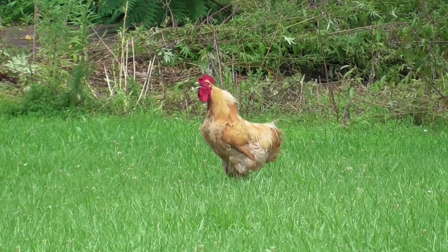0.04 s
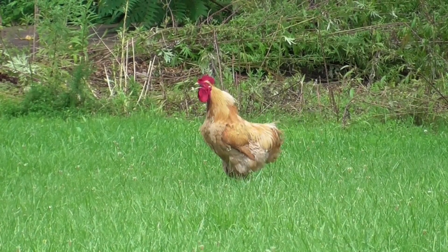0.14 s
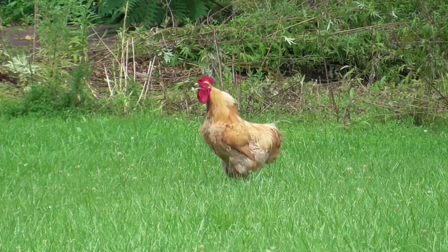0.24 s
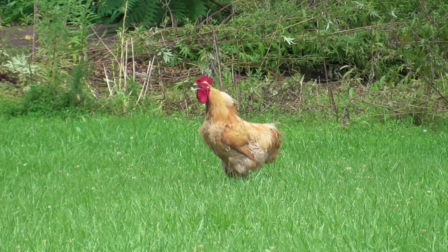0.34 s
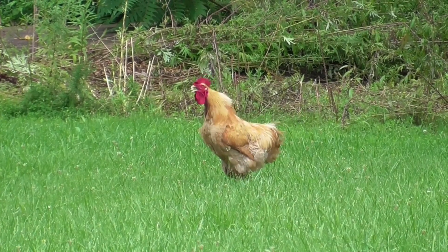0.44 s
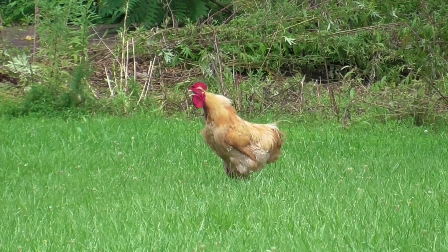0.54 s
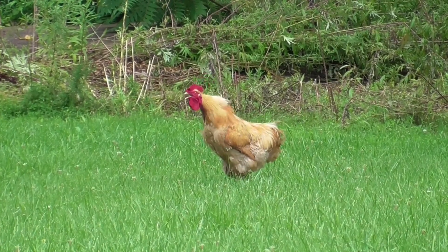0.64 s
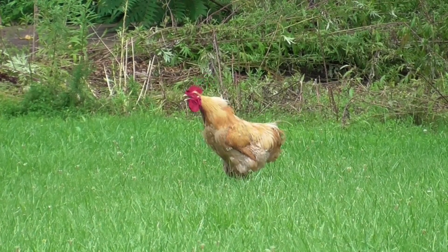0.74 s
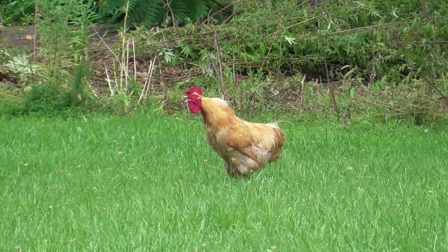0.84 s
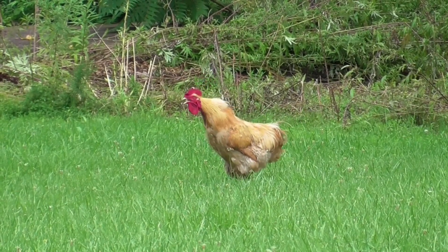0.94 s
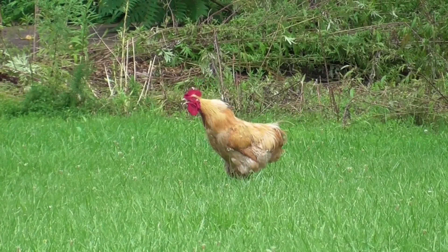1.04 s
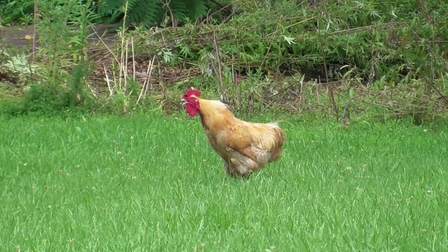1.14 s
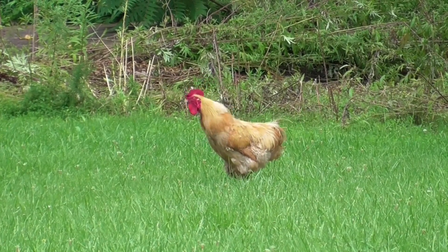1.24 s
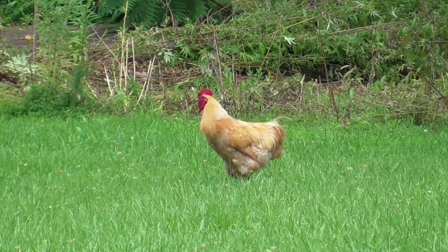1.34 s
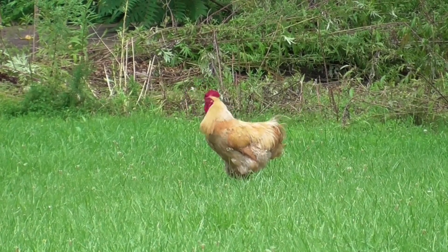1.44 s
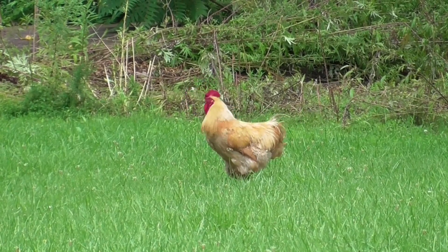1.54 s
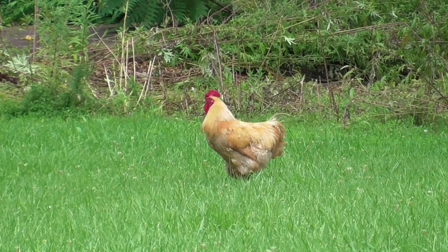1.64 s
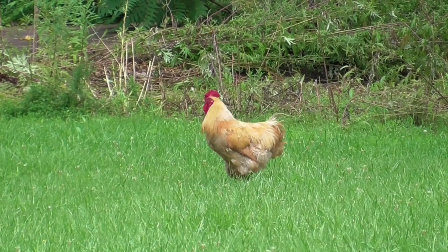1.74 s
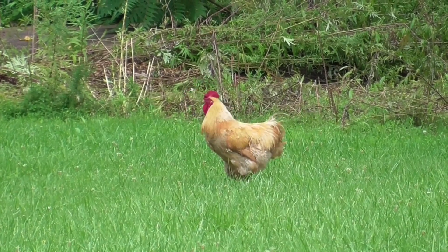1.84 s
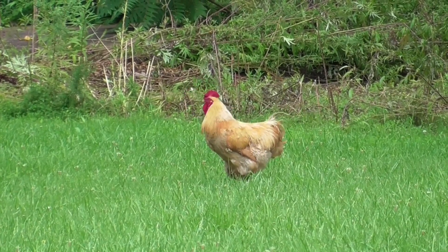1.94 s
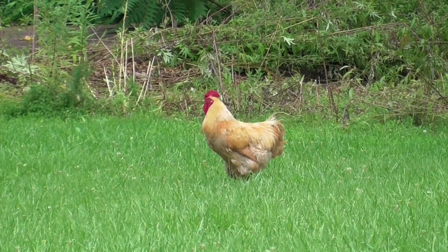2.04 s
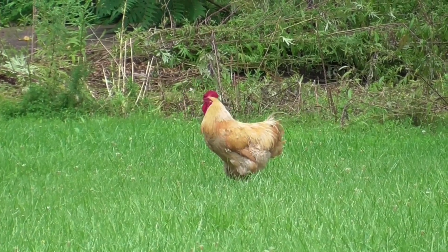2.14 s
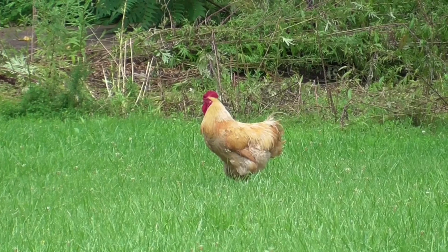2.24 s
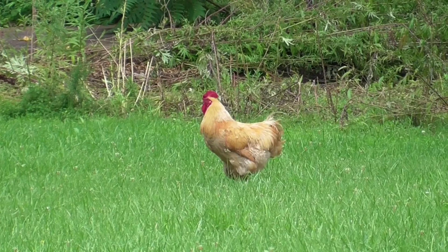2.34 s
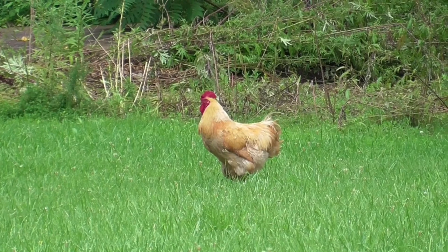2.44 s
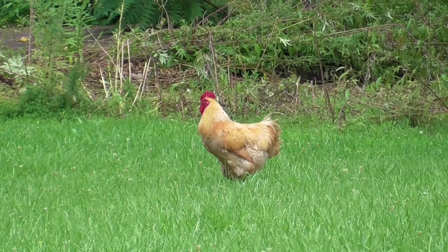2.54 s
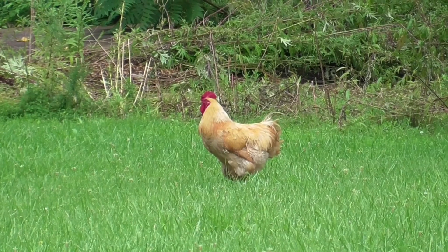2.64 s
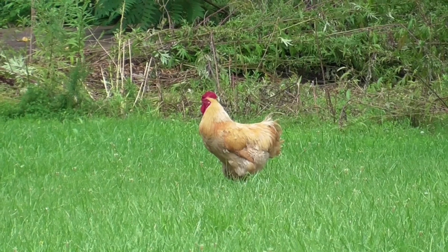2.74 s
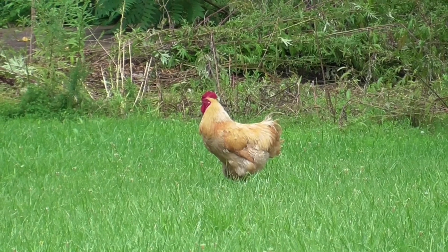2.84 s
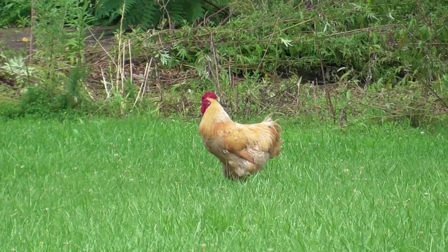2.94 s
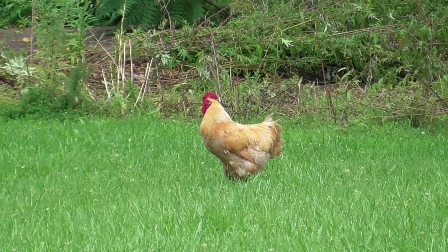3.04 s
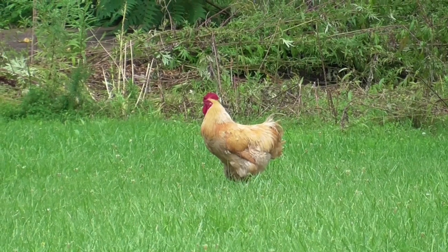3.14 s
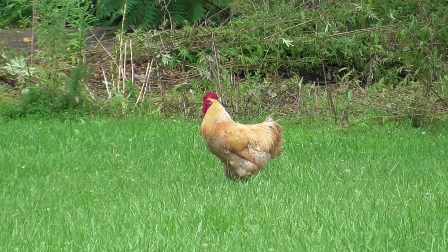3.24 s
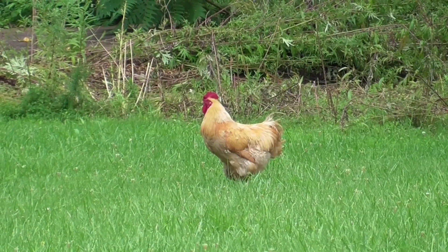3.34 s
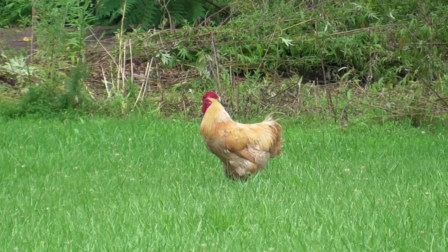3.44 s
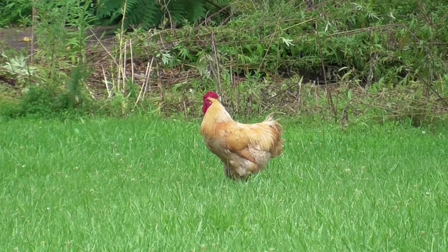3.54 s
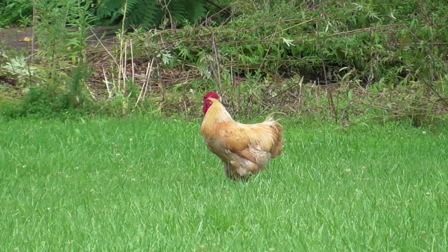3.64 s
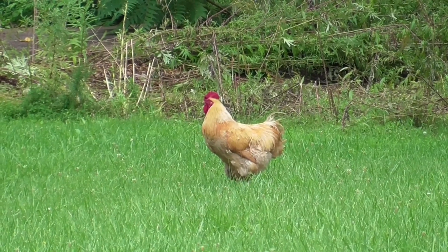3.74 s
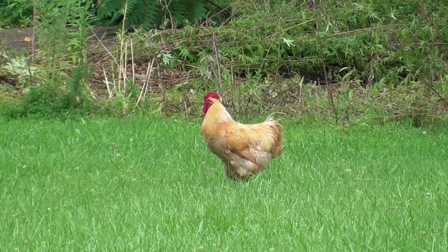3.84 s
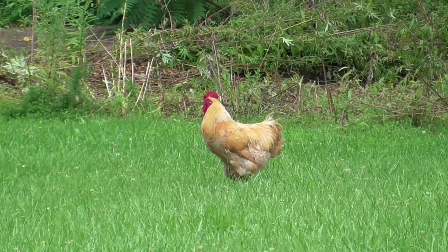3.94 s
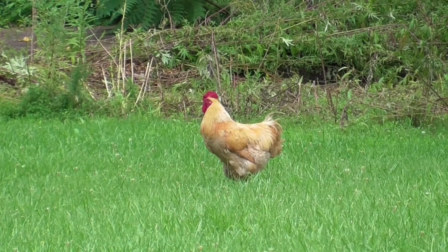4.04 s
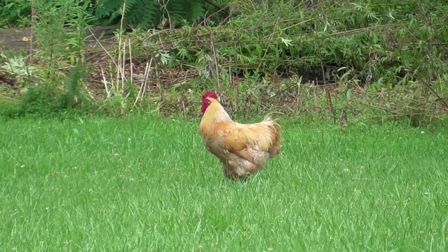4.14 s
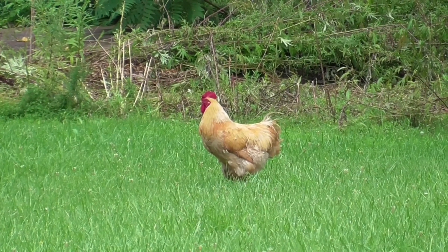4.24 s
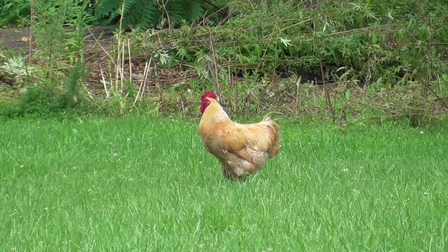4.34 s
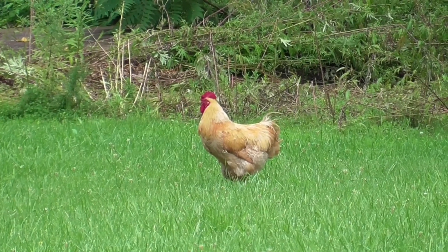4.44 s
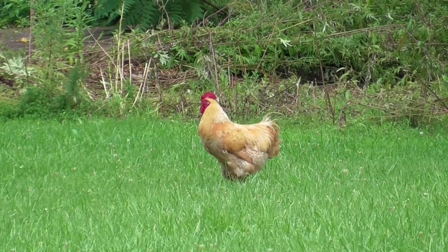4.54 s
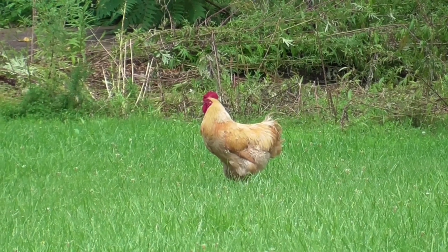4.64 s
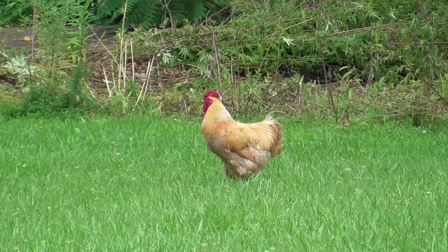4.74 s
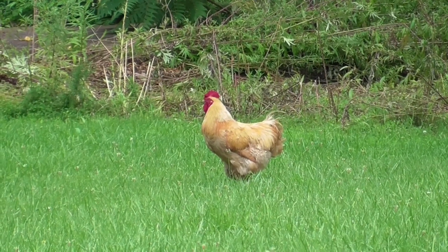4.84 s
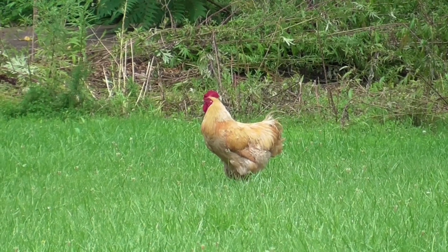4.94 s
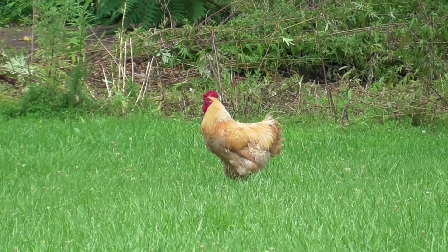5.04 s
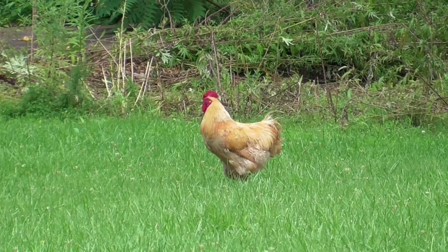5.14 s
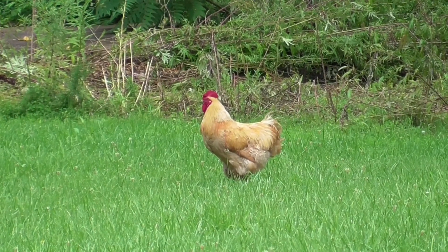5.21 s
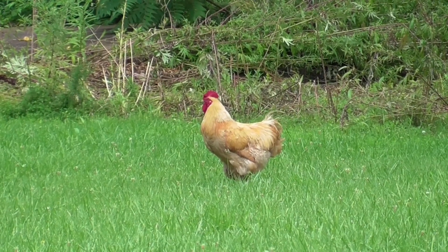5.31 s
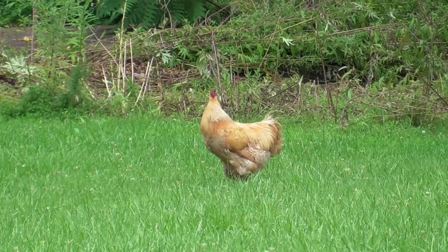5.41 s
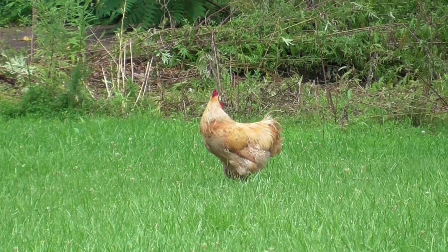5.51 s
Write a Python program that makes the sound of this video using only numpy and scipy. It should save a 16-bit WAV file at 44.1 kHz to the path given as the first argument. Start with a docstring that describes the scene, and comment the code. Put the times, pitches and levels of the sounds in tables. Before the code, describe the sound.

The sound begins inside a rooster's crow. A brief hoarse syllable sags for about 0.1 seconds, then a clear, strong, slightly swaying note near 720 Hz with a dominant octave above holds until 0.7, swelling in the middle. It breaks into a rough, buzzing two-pitched rasp that arches, tires, dulls and drops off at about 1.36. A dull echo from shrubs trails away for over a second. Throughout, a high cricket near 8 to 9 kHz chirps about eighteen times a second with short gaps, over insect hiss, a lower cricket throbbing four times a second, and a very faint pulsing high whine. Distant traffic rumble and engine drone slowly recede. From about 1.8 to 5.2, faint far birds give thin gliding whistles and a couple of chips. Close light, dry knocks come at 4.1, most clearly at 4.25 to 4.27 as a quick double, and faintly at 4.7.

```python
"""At once a rooster is in mid-crow: a hoarse syllable, a clear held note, then a rasp that sags and stops.
One sounding membrane makes the clear note, two at clashing pitches the rasp; the garden echoes the call.
High cricket chirps, made of arching whistles, start with it, over noise shaped into rumble and hiss;
a lower cricket throbs and a faint high whine pulses. After the crow, gliding tones make far birds.
Late on come a few light knocks close by, each a tone that dies within milliseconds."""
import sys
import numpy as np
from scipy import signal
from scipy.fft import rfft, irfft
from scipy.io import wavfile
from scipy.ndimage import uniform_filter1d

SR = 44100
rng = np.random.default_rng(int(sys.argv[2]) if len(sys.argv) > 2 else 0)


def to_wav(s):
    """Save 16-bit WAV."""
    ch = np.atleast_2d(s).T  # columns
    pcm = np.round(np.clip(ch, -1, 1) * 32767)  # PCM
    wavfile.write(sys.argv[1], SR, pcm.astype(np.int16))


N = 245637
T = np.arange(N) / SR   # time of every sample [s]
HZ = np.maximum(np.arange(N // 2 + 1) * SR / N, 1)   # every frequency in the spectrum [Hz]


def from_db(db):
    """Decibels to gain."""
    return 10 ** (np.asarray(db) / 20)


def rms_one(x):
    """Scale to unit power."""
    return x / np.sqrt(np.mean(x ** 2) + 1e-20)


def over_hz(points):
    """Read a table at every frequency, with straight lines over log frequency."""
    hz, value = np.transpose(points)
    return np.interp(np.log(HZ), np.log(hz), value)


def colour(x, gain):
    """Filter by a gain per frequency."""
    return irfft(rfft(x) * gain, N)


def hump(hz, width_hz):
    """A resonance applied twice, so its skirts are steep."""
    return 1 / (1 + 1j * (HZ - hz) / width_hz) ** 2


def band(hz, width_hz):
    """A broad resonance with steep flanks."""
    return 1 / np.sqrt(1 + (2 * (HZ - hz) / width_hz) ** 6)


def drift(rate_hz):
    """Random wander, mostly slower than the given rate; rms 1."""
    return rms_one(colour(rng.standard_normal(N), 1 / (1 + (HZ / rate_hz) ** 2)))


def ramp(start_s, end_s):
    """Rises from 0 to 1 between two times."""
    return np.clip((T - start_s) / (end_s - start_s), 0, 1)


def add(track, s, sound):
    """Mix a short sound in at a time."""
    at = max(round(s * SR), 0)
    track[at:at + len(sound)] += sound[:max(N - at, 0)]


def widen(mid, side, alike):
    """Blend two noises into left and right: 1 makes them equal, 0 unrelated, -1 opposite."""
    return mid * np.sqrt(1 + alike) + side * np.sqrt(1 - alike) * [[1], [-1]]


# how alike the background is at left and right: (frequency [Hz], likeness [-1 to 1])
EAR_LIKENESS = [(30, -0.18), (55, 1), (80, 0.92), (115, 0.99), (165, 0.94), (280, 0.83), (700, 0.61),
                (1400, 0.29), (3000, 0.4), (5000, 0.55), (8200, -0.3), (11000, -0.16), (15000, 0.56)]
# which side the background leans to: (frequency [Hz], left minus right [dB])
SIDE_LEAN = [(30, 4), (100, -1), (200, -0.5), (700, -.5), (1400, -2), (2400, -1), (4400, -0.5), (7200, 2.5),
             (8400, 2), (10000, -2), (15000, -1.5)]


def stereo_noise(gain):
    """Coloured noise whose likeness and balance between the ears change with frequency; rms 1."""
    alike = np.clip(over_hz(EAR_LIKENESS), -1, 1)
    mid, side = rfft(rng.standard_normal((2, N)))
    ears = widen(mid, side, alike)
    balance = from_db(over_hz(SIDE_LEAN) * [[.5], [-.5]])
    return rms_one(irfft(ears * gain * balance, N))


# colour of far traffic and open air: (frequency [Hz], relative level per Hz [dB])
TRAFFIC_COLOUR = [(15, -66), (25, -36), (38, -14), (52, -16.5), (80, -3), (155, -4), (185, 1.5), (331, -11),
                  (539, -14.5), (594, -7), (654, -12.5), (928, -11.5), (1370, -15), (1800, -30),
                  (2600, -42), (3380, -67), (5720, -120)]
# drone of far engines: (frequency [Hz], width [Hz], level [dB])
ENGINE_DRONE = [(197, 97, -66), (610, 22.7, -65)]
# colour of the insect chorus and hiss: (frequency [Hz], relative level per Hz [dB])
INSECT_COLOUR = [(2000, -19), (3000, -20), (4400, -17), (4850, -15.5), (6200, -22), (7000, -12.5),
                 (7500, -9.5), (8100, -2), (8650, -4), (9550, -19), (12800, -20), (13700, -20),
                 (14700, -18), (16000, -36)]


def background(traffic_db=-46.5, fade_db_per_s=0.49, insects_db=-60.5):
    """Slowly receding traffic rumbles and engines drone under the steady hiss of many insects."""
    traffic = from_db(traffic_db - fade_db_per_s * T) * stereo_noise(from_db(over_hz(TRAFFIC_COLOUR)))
    drone = sum(from_db(db) * stereo_noise(hump(hz, width)) for hz, width, db in ENGINE_DRONE)
    insects = from_db(insects_db) * stereo_noise(from_db(over_hz(INSECT_COLOUR)))
    return traffic + drone + insects


def whine(level_db=-79, centre_hz=13600, width_hz=1300, pulses_per_s=60, sharpness=3):
    """A faint, very high electrical hiss pulses at a steady rate."""
    gate = rms_one(np.exp(sharpness * np.cos(2 * np.pi * pulses_per_s * T)))
    return from_db(level_db) * gate * stereo_noise(band(centre_hz, width_hz))


def far_cricket(level_db=-75, uneven_db=-0.5, throb_hz=4.386, crest_s=1.915):
    """A lower cricket, blurred to noise by distance, throbs with a slightly uneven level."""
    throb = 1 + .55 * np.cos(2 * np.pi * throb_hz * (T - crest_s))
    level = from_db(level_db + uneven_db * drift(9.5))
    return level * throb * stereo_noise(hump(4860, 180))


# a far bird's calls, a rising whistle with a lower falling one just behind: (time [s], level [dB])
FAR_CALLS = [(1.773, -74), (2.79, -77), (3.115, -72), (3.28, -76), (3.981, -75), (4.322, -74), (4.831, -74),
             (5.078, -72)]
# short falling bird chips: (time [s], length [s], pitch [Hz], level [dB])
BIRD_CHIPS = [(3.116, 0.044, 5260, -69), (3.973, 0.015, 4320, -64.5)]
# glides are shares of the pitch
WHISTLE_S, UPPER_HZ, UPPER_GLIDE = 0.1043, 3990, 0.039
LOWER_HZ, LOWER_GLIDE, LOWER_LAG_S, LOWER_DB = 3230, -0.12, 0.019, -6
CHIP_GLIDE = -0.077


def birds():
    """Thin far whistles glide and level off, with a slight tremble in pitch."""
    out = np.zeros(N)
    wander = 1 + .005 * drift(120)
    notes = [(s, WHISTLE_S, UPPER_HZ, UPPER_GLIDE, db) for s, db in FAR_CALLS]
    notes += [(s + LOWER_LAG_S, WHISTLE_S, LOWER_HZ, LOWER_GLIDE, db + LOWER_DB) for s, db in FAR_CALLS]
    notes += [(s, length, hz, CHIP_GLIDE, db) for s, length, hz, db in BIRD_CHIPS]
    for s, length, hz, glide, db in notes:
        u = np.linspace(0, 1, int(length * SR))   # progress through the note
        tremble = np.roll(wander, -int(s * SR))[:len(u)]
        pitch = hz * (1 + glide * np.sin(np.pi * u / 2)) * tremble
        swell = np.sqrt(abs(np.sin(np.pi * u)))
        add(out, s, from_db(db) * swell * np.sin(2 * np.pi * np.cumsum(pitch) / SR))
    return out


# trains of the nearest cricket: (first chirp [s], last chirp [s])
CHIRP_TRAINS = [(.018, .26), (.345, 1.07), (1.129, 1.8), (1.857, 2.369), (2.429, 2.551), (2.765, 2.929),
                (2.984, 3.379), (3.434, 5.55)]
CHIRP_EVERY_S = .0558   # roughly: each train is divided evenly
STROKE_HZ, STROKE_RISE_HZ = 8045, 868   # a wing stroke's pitch at its ends, and its rise in the middle


def cricket(level_db=-54.5, stroke_s=0.019, lead_s=0.01, edge_db=-12, spread_db=1.5, pan_db=1.0,
            lag_s=.000026):
    """Each wing stroke speeds up and slows, so its whistle arches; it reaches the right ear a little later."""
    speed = np.sin(np.linspace(0, np.pi, int(stroke_s * SR)))
    pitch = STROKE_HZ + STROKE_RISE_HZ * speed ** 2
    swell = from_db(edge_db * (1 - speed))
    left, right = np.zeros((2, N))
    for first, last in CHIRP_TRAINS:
        for s in np.linspace(first, last, round((last - first) / CHIRP_EVERY_S) + 1):
            detune, force = rng.standard_normal(2)   # every stroke differs a little
            phase = 2 * np.pi * np.cumsum(pitch * (1 + 0.0075 * detune)) / SR
            late_phase = phase - 2 * np.pi * pitch * lag_s
            stroke_db = level_db + spread_db * force
            add(left, s - lead_s, swell * from_db(stroke_db + pan_db) * np.sin(phase))
            add(right, s - lead_s, swell * from_db(stroke_db - pan_db) * np.sin(late_phase))
    return np.array([left, right])


# light knocks: (time [s], peak level [dB], ring pitch [Hz], time to fall 60 dB [s])
LIGHT_KNOCKS = [(4.102, -55, 2530, .008), (4.25, -30.5, 625, 0.007), (4.2703, -36, 820, 0.0087),
                (4.2715, -45.5, 2420, 0.007), (4.708, -52.5, 2060, 0.006)]


def knocks(rise_s=0.0002):
    """Each light contact rings for a few cycles."""
    out, t = np.zeros(N), T[:SR // 20]
    for s, db, hz, t60 in LIGHT_KNOCKS:
        envelope = (1 - np.exp(-t / rise_s)) ** 2 * from_db(-60 * t / t60)
        ring = envelope * np.sin(2 * np.pi * hz * t)
        add(out, s, from_db(db) * ring / abs(ring).max())
    return out


def garden(x, likeness=0.73, build_s=0.016, t60_s=1.48, cut_hz=4700):
    """Shrubs and trees scatter a dull, quickly building echo that dies away slowly."""
    tail = from_db(-60 * T / t60_s) * (1 - np.exp(-T / build_s))
    mid, side = rng.standard_normal((2, N)) * tail
    echo = rms_one(widen(mid, side, likeness)) / np.sqrt(N)
    dull = signal.sosfilt(signal.butter(2, cut_hz, fs=SR, output="sos"), x)
    return signal.fftconvolve(dull[None], echo, axes=1)[:, :N]


def partial(phase, order):
    """One harmonic of the syrinx, the bird's voice organ; rms 1."""
    return np.sqrt(2) * np.sin(order * phase)


def syrinx(pitch, hoarse, clear_jitter=0.00392, rasp_jitter=0.0194, jitter_hz=170):
    """The phase of a membrane that beats nearly evenly; pushed harder, its cycles go uneven."""
    wobble = clear_jitter * drift(77.0) + rasp_jitter * hoarse * drift(jitter_hz)
    return 2 * np.pi * np.cumsum(pitch * (1 + wobble)) / SR


def pulses(phase):
    """One sharp puff per cycle, made of harmonics 3 to 18; rms 1."""
    return rms_one(sum(partial(phase, order=k) for k in range(3, 19)))


def joined(x, join_s=0.012):
    """The throat glides from one setting to the next."""
    return uniform_filter1d(x, max(int(join_s * SR), 1))


OPENING_HZ, OPENING_SAG_HZ_PER_S = 754.8, 280   # the first syllable starts high and sags
# the held note sways about its pitch, and is reached from just below
HELD_HZ, SWAY_HZ, SWAY_CREST_S, SWAY_PERIOD_S = 719, 9, .24, .65
SCOOP_HZ, SCOOP_S = 14.2, 0.02986
ARCH_S, ARCH_HZ, ARCH_BEND_HZ_PER_S2 = .92, 773.5, 720   # the last syllable arches over this crest
RELEASE_DROP_HZ = 70   # pitch collapse at the very end


def melody(syllable, age, release):
    """A sagging opening, the swaying held note, then an arch that collapses at its end."""
    opening = OPENING_HZ - OPENING_SAG_HZ_PER_S * T
    sway = SWAY_HZ * np.cos(2 * np.pi * (T - SWAY_CREST_S) / SWAY_PERIOD_S)
    held = HELD_HZ + sway - SCOOP_HZ * np.exp(-age / SCOOP_S)
    arch = ARCH_HZ - ARCH_BEND_HZ_PER_S2 * (T - ARCH_S) ** 2 - RELEASE_DROP_HZ * release ** 2
    return joined(np.choose(syllable, [opening, held, arch]))


def windpipe(lead, free, hoarse, free_db=-7, air_db=-7, air_hz=1480, air_width_hz=180, half_tone_db=-16,
             third_db=-39, rasp_loss=0.38):
    """The windpipe favours the second harmonics; in the rasp, air and a half-tone crowd round them."""
    air = from_db(air_db) * rms_one(colour(rng.standard_normal(N), hump(air_hz, air_width_hz)))
    half_tone = from_db(half_tone_db) * partial(lead + drift(34), order=3 / 2)
    second = (1 - rasp_loss * hoarse) * partial(lead, order=2)
    third = from_db(third_db) * partial(lead, order=3)
    rasp = from_db(free_db) * partial(free, order=2) + air + half_tone
    return second + third + hoarse * rasp


# overtones of the clear note: (multiple of the pitch, relative level at first [dB],
# relative level with the neck stretched [dB])
CLEAR_OVERTONES = [(5, -23.5, -24.5), (6, -20, -24), (7, -20, -29), (8, -27, -13), (9, -16, -28),
                   (10, -43, -25), (11, -27, -19), (12, -21, -32), (13, -41, -16), (14, -21.5, -13),
                   (15, -36, -28), (16, -29, -23.5), (17, -46, -32), (18, -26, -24)]


def clear_overtones(phase, stretch_s=0.506, stretch_time_s=0.053):
    """The upper harmonics flutter, and change balance as the neck stretches."""
    stretch = np.clip((T - stretch_s) / stretch_time_s + .5, 0, 1)
    out = 0
    for k, early_db, late_db in CLEAR_OVERTONES:
        flutter_db = 3.5 * drift(12)
        out = out + from_db(early_db + stretch * (late_db - early_db) + flutter_db) * partial(phase, order=k)
    return out / np.sqrt(uniform_filter1d(out ** 2, SR // 10))   # evens the level over 0.1 s


# resonances of throat and open beak in the rasp: (frequency [Hz], width [Hz], relative level [dB])
BEAK_RESONANCES = [(4300, 530, -12.5), (4910, 590, -1.5), (6260, 1100, -5), (7320, 140, 0),
                   (8640, 1600, -12.5), (9940, 260, -5.5), (11500, 540, -14), (13900, 3400, -29)]


def beak_rasp(lead, free, free_db=0, air=0.89):
    """Both pulse trains and the air they let through ring the open beak."""
    turbulence = air * (1 + np.cos(lead)) * rng.standard_normal(N)
    beak = np.sqrt(sum((from_db(db) * band(hz, width)) ** 2 for hz, width, db in BEAK_RESONANCES))
    return rms_one(colour(pulses(lead) + from_db(free_db) * pulses(free) + turbulence, beak))


# the crow's syllables, each running into the next, with levels before the swells and flares below:
# (start [s], hoarseness [0-1], main resonance [dB], fundamental [dB], second resonance [dB],
# its change [dB per s], bright overtones [dB], their opening accent [dB])
CROW_SYLLABLES = [(0, 0.97, -41.5, -52.5, -64, -20, -61.5, 11),
                  (.115, 0.03, -42, -50.5, -55.5, -48, -59.5, 10.5),
                  (.729, 0.9, -44.5, -50.5, -76.5, 26, -51, -9)]
CROW_END_S, ACCENT_S = 1.362, 0.0092   # end of the crow; decay of the accents
SWELL_S, SWELL_WIDTH_S, SWELL_DB = 0.46, 0.16, 2.5   # the held note swells in its middle
FREE_HZ, FREE_SAG_HZ_PER_S = 749, 48   # the other membrane, which breaks free when the voice is hoarse
# as the air runs out the rasp smooths and dulls and the main resonance comes forward
TIRE_S, TIRE_SMOOTHS, TIRE_DULL_DB, TIRE_MAIN_DB = 1.047, 0.56, -10.5, 5.5
RELEASE_S, RELEASE_DB = .05, -26   # at the very end the overtones go
# the fourth harmonic flares as it passes this resonance
SECOND_HZ, SECOND_WIDTH_HZ, SECOND_BOOST_DB = 2825, 14, 12


def rooster(free_low_db=-12, shimmer=0.19, flutter_db=1.0, flutter_hz=14):
    """One membrane sings the clear note; two at clashing pitches make the rasp."""
    syllable = np.searchsorted([row[0] for row in CROW_SYLLABLES[1:]], T)
    settings = np.array(CROW_SYLLABLES)[syllable].T
    start, hoarse, main_db, low_db, second_db, second_slope, bright_db, accent_db = settings
    age = T - start
    tired = ramp(TIRE_S, CROW_END_S)
    release = ramp(CROW_END_S - RELEASE_S, CROW_END_S)
    swell_db = SWELL_DB * np.exp(-((T - SWELL_S) / SWELL_WIDTH_S) ** 2)
    hoarse = np.clip(joined(hoarse) * (1 - TIRE_SMOOTHS * tired), 0, 1)
    pitch = melody(syllable, age, release)

    # loudness of each part of the voice
    main_flutter_db = flutter_db * (2.5 - hoarse) * drift(flutter_hz)
    main = joined(from_db(main_db + swell_db + TIRE_MAIN_DB * tired + main_flutter_db))
    flare_db = SECOND_BOOST_DB / (1 + ((4 * pitch - SECOND_HZ) / SECOND_WIDTH_HZ) ** 2)
    second = joined(from_db(second_db + second_slope * age + flare_db))
    accent = accent_db * np.exp(-age / ACCENT_S)
    bright = joined(from_db(bright_db + swell_db + accent + TIRE_DULL_DB * tired))

    lead = syrinx(pitch, hoarse)
    free = syrinx(FREE_HZ - FREE_SAG_HZ_PER_S * T, hoarse)
    fundamental = partial(lead, order=1) + hoarse * from_db(free_low_db) * partial(free, order=1)
    # hoarseness moves the second resonance towards the free membrane's fourth harmonic
    fourth = (1 - hoarse ** 2 / 2) * partial(lead, order=4) + hoarse ** 2 * partial(free, order=4)
    top = np.sqrt(1 - hoarse) * clear_overtones(lead) + np.sqrt(hoarse) * beak_rasp(lead, free)
    overtones = main * windpipe(lead, free, hoarse) + second * fourth + bright * top
    voice = joined(from_db(low_db)) * fundamental + from_db(RELEASE_DB * release) * overtones
    fade_out = np.clip((CROW_END_S - T) / 0.024 + .5, 0, 1)
    return voice * (1 + shimmer * hoarse * drift(130)) * fade_out


def scene(pan_db=.5, garden_db=-5):
    """Rooster and birds call from almost straight ahead, with the garden all round."""
    calls = rooster() + birds()
    direct = calls * from_db([[pan_db], [-pan_db]])
    echo = from_db(garden_db) * garden(calls)
    return background() + whine() + far_cricket() + cricket() + knocks() + echo + direct


def record(dry, cutoff_hz=15700):
    """The top is cut steeply."""
    return colour(dry, 1 / np.sqrt(1 + (HZ / cutoff_hz) ** 1200))


dry = scene()
out = record(dry)
to_wav(out)
```